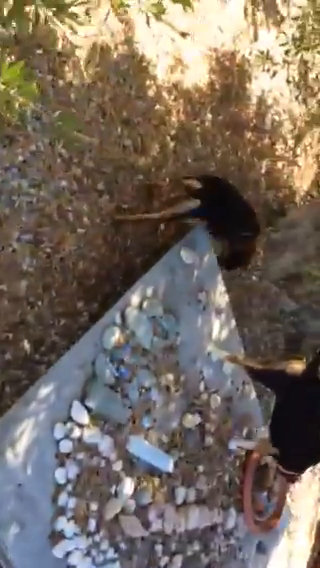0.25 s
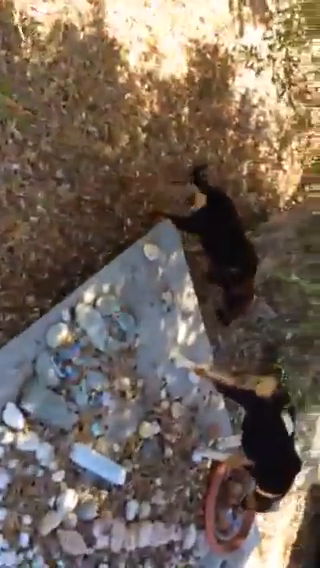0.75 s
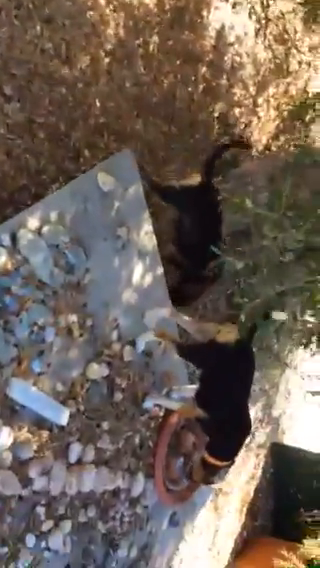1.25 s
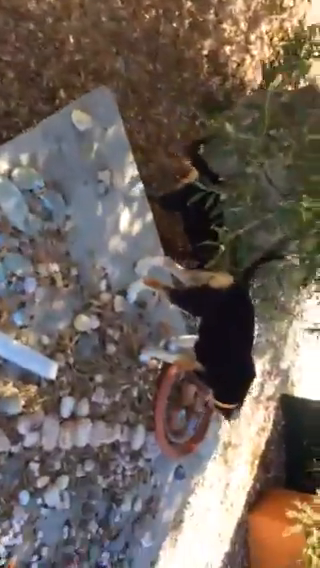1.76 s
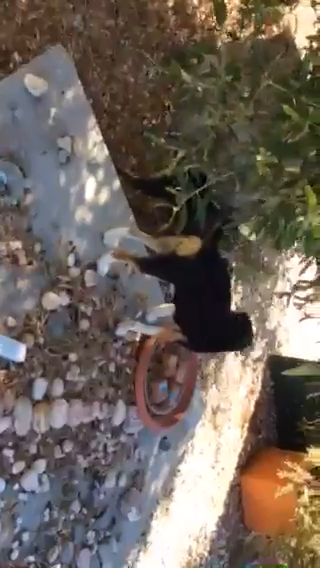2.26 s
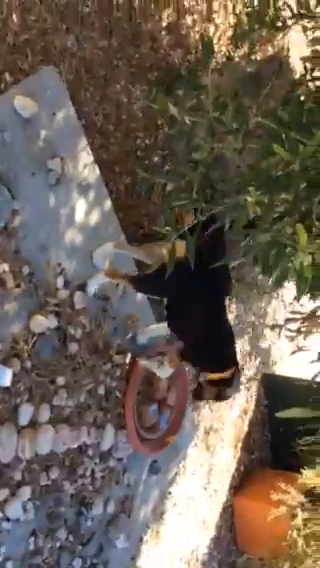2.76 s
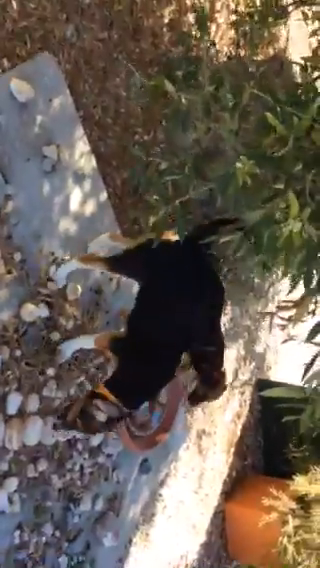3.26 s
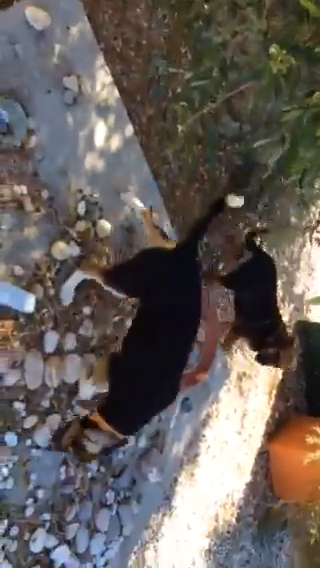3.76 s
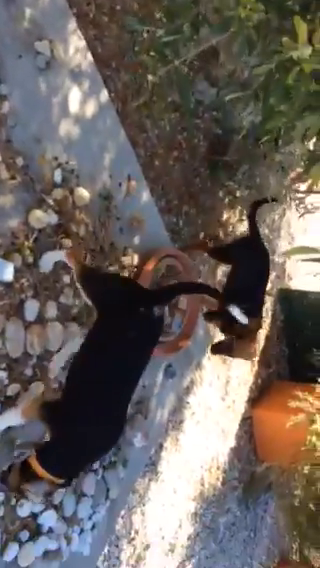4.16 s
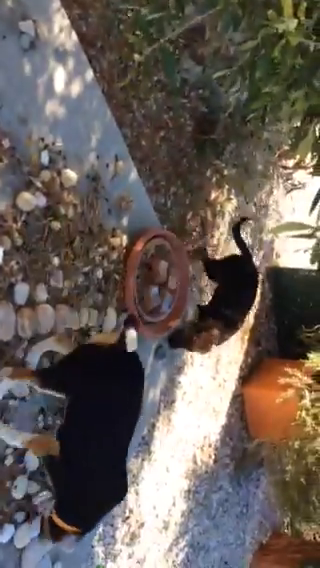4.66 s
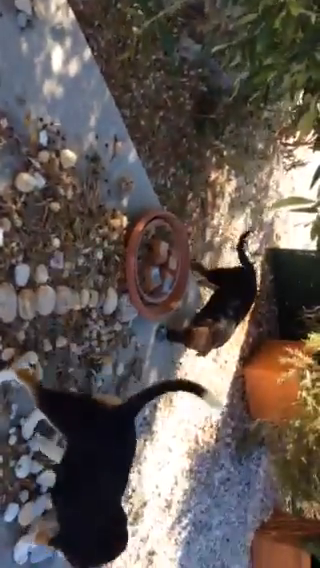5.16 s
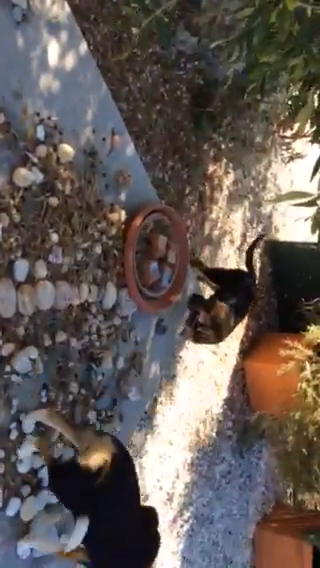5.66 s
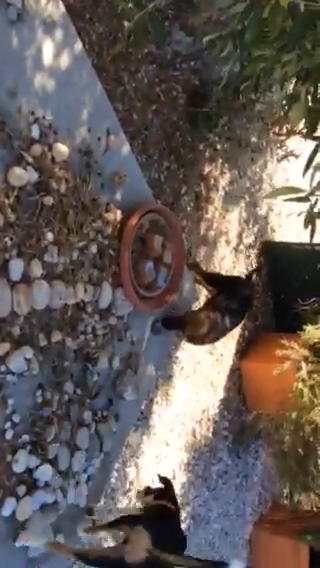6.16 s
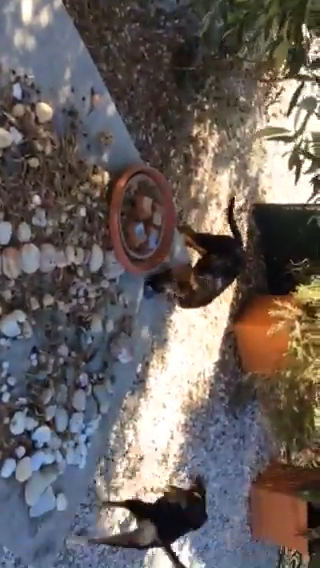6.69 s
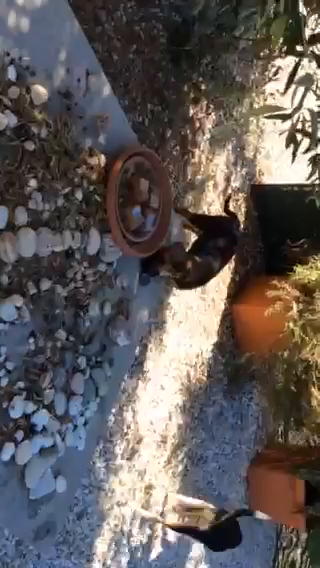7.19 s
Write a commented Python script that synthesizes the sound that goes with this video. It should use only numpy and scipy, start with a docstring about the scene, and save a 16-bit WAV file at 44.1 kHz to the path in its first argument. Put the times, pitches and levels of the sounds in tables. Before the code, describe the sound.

A constant high insect drone outdoors, with low breeze thumps at first, then a burst of close crunchy rubbing, clicks and dull taps that thins out.

```python
"""Cicadas around a yard, with handling close by

Cicadas buzz steadily in the trees, heard from a handheld phone: trains of clicks coloured by hollow bodies.
A light breeze buffets the microphone, mostly in the first three seconds, as shaped noise and single eddies.
Close to the microphone, mostly after that, come gritty rubbing scuffs and a dry crackle made of random clicks,
sharp bright ticks made of noise bursts, and soft knocks of fingers that ring the case's modes.
Behind lie a few faint far-off tones and a patchy outdoor background of filtered noise."""
import sys
import numpy as np
from scipy import signal
from scipy.fft import rfft, irfft
from scipy.io import wavfile
from scipy.ndimage import uniform_filter1d

SR = 44100
rng = np.random.default_rng(int(sys.argv[2]) if len(sys.argv) > 2 else 0)


def materialize(psi):
    """Save the field psi as 16-bit PCM at rate SR to the path in sys.argv[1].

    A 1-D psi becomes a single channel; in a 2-D psi each row is a channel.
    """
    bounded = np.clip(np.atleast_2d(psi).T, -1, 1)
    quanta = np.round(bounded * 32767).astype(np.int16)
    wavfile.write(sys.argv[1], SR, quanta)


N = 327663
TIME = np.arange(N) / SR
YARD_T60 = 0.31  # s


def gain_of(db):
    """Decibels to amplitude."""
    return 10 ** (np.asarray(db) / 20)


def evened(x):
    """Scales to rms 1."""
    return x / np.sqrt(np.mean(x ** 2) + 1e-20)


def read(points, hz):
    """A spectrum's level at any frequency, interpolated over log frequency."""
    f, level = np.transpose(points)
    return np.interp(np.log(hz + 1), np.log(f + 1), level)


def add(mix, s, sound):
    """Adds a sound to the mix from time s, or from the very start if s is negative."""
    part = mix[max(round(s * SR), 0):][:len(sound)]
    part += sound[:len(part)]


def colour(x, points, size=8192):
    """Causal minimum-phase filter with the given spectrum, falling 60 dB per octave beyond its ends."""
    hz = abs(np.fft.fftfreq(size, 1 / SR)) + 1
    octaves_outside = abs(np.log2(hz / np.clip(hz, points[0][0], points[-1][0])))
    level_db = np.maximum(read(points, hz) - 60 * octaves_outside, -100)
    log_gain = np.log(gain_of(level_db))
    response = np.exp(np.conj(signal.hilbert(log_gain)))
    taps = np.fft.ifft(response).real[:size // 2]
    return signal.oaconvolve(x, taps)[:len(x)]


def wander(rate):
    """Slow chance of rms 1, with changes up to about the given rate in Hz."""
    hz = np.fft.rfftfreq(N, 1 / SR)
    count = np.count_nonzero(hz < 300)
    spectrum = rfft(rng.standard_normal(4 * count))  # drawn coarsely, then interpolated
    slow = irfft(spectrum / (1 + (np.arange(2 * count + 1) * hz[1] / rate) ** 4))
    return evened(np.interp(TIME, np.linspace(0, TIME[-1], len(slow)), slow - slow.mean()))


def grains(per_s, spread_db):
    """Random clicks of very uneven size."""
    size = gain_of(spread_db * np.minimum(rng.exponential(1, N), 4))
    return size * rng.choice([-1, 1], N) * (rng.random(N) < per_s / SR)


def patchy(x, depth_db, size, count):
    """Narrow patches of the spectrum swell and fade by chance, each lasting count frames of the given size."""
    overlap = size - size // 4
    z = signal.stft(x, nperseg=size, noverlap=overlap)[2]
    across_pitch = uniform_filter1d(rng.standard_normal(z.shape), size=5, axis=0)
    patches = evened(uniform_filter1d(across_pitch, size=count, axis=1))
    return signal.istft(z * gain_of(depth_db * patches), nperseg=size, noverlap=overlap)[1][:N]


def scatter(x, t60):
    """Dense echoes from leaves, walls and ground: a decaying noise tail."""
    t = TIME[:SR // 2]
    tail = rng.standard_normal(len(t)) * gain_of(-60 * t / t60)
    return irfft(rfft(x, 2 * N) * rfft(tail / np.linalg.norm(tail), 2 * N))[:N]


def tymbals(throb, ring_turns, drift=.006):
    """Each cicada's tymbals buckle in a fast train of short noisy clicks that throbs in syllables."""
    # one row a cicada: [clicks/per s, syllables/per s, relative level/dB, direct share of its power/0-1]
    singers = [(233, 4.9, -7.5, 0.86), (228, 22, -7, 0.06), (228.4, 6.4, -9, 0.24), (249, 44, -7.5, 0.13),
               (228.8, 2.7, -7, 0.11)]
    out = np.zeros(N)
    for clicks, syllables, db, direct in singers:
        turns = np.cumsum(clicks * (1 + drift * wander(2))) / SR
        syllable_turns = np.cumsum(syllables * (1 + 0.137 * wander(2.18))) / SR
        swing = 1 + throb * np.sin(2 * np.pi * syllable_turns)
        ringing = np.exp(-(turns % 1) / ring_turns)  # decay counted in click periods
        near = evened(ringing * rng.standard_normal(N))
        smeared = rng.standard_normal(N)  # foliage blurs the clicks but spares the syllables
        share = np.clip(direct, 0, 1)
        out += gain_of(db) * swing * (np.sqrt(share) * near + np.sqrt(1 - share) * smeared)
    return out


def cicadas(main_db=-45, low_db=-54.5, top_db=-52, waver_db=0.5, patch_db=1.29):
    """The clicks ring hollow bodies: a strong peak near 5.5 kHz between two softer humps.

    The song's narrow bands swell and fade by chance."""
    # the song's main, lower and top humps: [f/Hz, relative level/dB per Hz]
    main_song = [(4000, -27), (4400, -20.5), (4750, -12.5), (5050, -5), (5520, 0.5), (5850, -1),
                 (6250, -9.5), (6750, -11.5), (7200, -16), (7800, -23.5)]
    low_song = [(1120, -35), (1900, -21.5), (2180, -10), (2360, -1.5), (2790, 7), (3320, 3.5), (3880, -3),
                (4260, -7.5), (4400, -12), (5720, -44), (9680, -120)]
    top_song = [(6500, -14), (7300, -8), (7950, -1.5), (8200, 0.5), (8800, -2), (9300, -6), (9800, -11),
                (11600, -9.5), (12300, -12.5), (13000, -30), (14400, -14), (15700, -41)]
    main = gain_of(main_db) * evened(colour(tymbals(throb=0.19, ring_turns=0.32), main_song))
    low = evened(colour(tymbals(throb=0.091, ring_turns=0.55), low_song))
    low = low * gain_of(low_db + waver_db * wander(2.7))
    top = evened(colour(tymbals(throb=0.24, ring_turns=0.95), top_song))
    top = top * gain_of(top_db + waver_db * wander(1.7))
    return patchy(main + low + top, depth_db=patch_db, size=1024, count=6)


def stroke(start, length, attack_s=0.0056, release_s=0.014, settle_db=-24, settle_s=0.029):
    """Pressure of the rub: it rises quickly, holds, lets go quickly, and leaves a faint longer tail."""
    after = np.maximum(TIME - start - length, 0)
    settle = gain_of(settle_db)
    release = (1 - settle) * np.exp(-after / release_s) + settle * np.exp(-after / settle_s)
    return np.clip((TIME - start) / attack_s, 0, 1) * release


def scuffs(scrape_db=0.0, rasp_db=1.0, grit_db=4.0, shift_db=4.0, clump_db=1.5, catch_db=3):
    """Tiny slips under pressure: a dull scrape and dry rasp of shifting tone, and fine grit in uneven clumps."""
    # rubbing scuffs close to the microphone: [start t/s, length/s,
    # then level/dB before trim of scrape, rasp and grit]
    rubs = [(0.274, 0.023, -58, -55.5, -52.5), (0.314, 0.041, -59, -71, -59), (0.682, 0.058, -80, -85, -56),
            (1.866, 0.024, -62, -74, -75), (2.813, 0.057, -61.5, -67.5, -59),
            (2.937, 0.064, -75, -57.5, -55.5), (3.041, 0.046, -52, -61, -52),
            (3.092, 0.063, -47.5, -54, -44), (3.13, 0.013, -49, -50, -43), (3.212, 0.069, -60.5, -69, -68),
            (3.339, 0.032, -50.5, -53, -54), (3.372, 0.041, -60, -61, -58), (3.624, 0.05, -57.5, -67, -66),
            (3.666, 0.042, -48, -53, -60), (3.688, 0.038, -52, -49, -50), (3.768, 0.02, -55, -52.5, -46),
            (3.787, 0.02, -54, -51, -42), (3.832, 0.011, -60, -54, -57), (4.014, 0.086, -51, -67, -53),
            (4.118, 0.043, -46, -58, -56), (4.169, 0.015, -57, -59, -55), (4.224, 0.013, -54, -60, -49),
            (4.31, 0.049, -52, -61, -66), (4.338, 0.04, -53, -58, -51.5), (4.532, 0.048, -58.5, -58, -63),
            (4.674, 0.023, -62, -75, -55), (4.738, 0.034, -54, -63, -58), (4.784, 0.072, -60, -79, -62),
            (4.962, 0.045, -51.5, -58, -57), (5.319, 0.027, -56, -66, -72), (5.868, 0.019, -60, -60, -74),
            (5.952, 0.044, -55, -63.5, -77), (6.353, 0.039, -57, -66, -75)]
    # colour of the dull scrape, dry rasp and fine grit: [f/Hz, relative level/dB per Hz]
    scrape_colour = [(130, -1), (200, 0.5), (290, 3.5), (390, 8.5), (500, -1), (660, 1.5), (860, 4.5),
                     (1080, -5), (1280, -4), (1600, -20.5)]
    rasp_colour = [(900, 6), (1400, 0.5), (2000, 1.5), (2800, -1.5), (3600, -28), (5500, 6)]
    grit_colour = [(2200, -10.5), (4000, -5), (8000, -4), (11500, 0.5), (14000, -1), (16000, 0)]
    catch = gain_of(catch_db * np.tanh(wander(80)))  # the rub catches and slips, thinning the sound
    scrape = colour(catch * grains(per_s=520, spread_db=2.0), scrape_colour)
    scrape = evened(patchy(scrape, depth_db=shift_db, size=1024, count=3))
    rasp = colour(grains(per_s=2600, spread_db=5.0), rasp_colour)
    rasp = evened(patchy(rasp, depth_db=shift_db, size=512, count=3))
    grit = colour(grains(per_s=13000, spread_db=5.0), grit_colour)
    grit = evened(grit * gain_of(clump_db * wander(90)))
    pressure = np.array([stroke(start, length) for start, length, *_ in rubs])
    # overlapping scuffs add in power
    dull, dry, fine = np.sqrt(gain_of(np.transpose(rubs)[2:]) ** 2 @ pressure ** 2)
    return gain_of(scrape_db) * dull * scrape + gain_of(rasp_db) * dry * rasp + gain_of(grit_db) * fine * grit


def crackle():
    """A dry mid-high crackle, as random clicks, during some scuffs."""
    # crackles: [start t/s, length/s, level/dB]
    crackles = [(3.094, 0.046, -57), (3.784, 0.017, -46), (4.114, 0.068, -51.5), (4.34, 0.034, -53)]
    # colour of the crackle: [f/Hz, relative level/dB per Hz]
    crackle_colour = [(2400, -11), (3200, -8), (4000, -5), (4800, -12), (7000, -9)]
    steady = evened(colour(grains(per_s=1100, spread_db=3.0), crackle_colour))
    return steady * sum(gain_of(db) * stroke(start, length) for start, length, db in crackles)


def ticks(tick_db=-2.5, rattle_db=-21, rattle_s=0.012, pitch_spread=0.032):
    """Sharp bright ticks, each with a lower clack and brief rattle, varying slightly in pitch."""
    # ticks: [t/s, snap's peak level/dB before trim, clack's level against the snap/dB]
    hits = [(0.094, -30, -16), (1.219, -26, -10), (1.483, -27, -35), (1.708, -29, -9), (2.852, -38, -22),
            (2.957, -22, -16), (3.046, -26, -19), (3.093, -25, -8), (3.111, -32, -15), (3.1405, -25, -12),
            (3.1437, -16.5, -12), (3.147, -24, -13), (3.159, -28, -18), (3.233, -15.5, -26),
            (3.355, -42, -1), (3.706, -33, 3), (3.721, -34, -15), (3.782, -28, -18), (3.8, -18.5, -24),
            (3.802, -19, -18), (3.806, -31, -13), (3.8118, -24, -28), (3.84, -25, -8), (3.849, -25, -16),
            (4.135, -25, -24), (4.17, -26, -18), (4.2295, -22, -15), (4.369, -38, -18), (4.693, -20.5, -7)]
    # colour of the bright snap and the lower clack: [f/Hz, relative level/dB per Hz]
    snap_colour = [(2000, -31), (3500, -31), (7000, -11), (9500, -3.5), (12000, 0), (14000, -2.5),
                   (15500, -2.5)]
    clack_colour = [(600, -3), (1200, 3), (1600, -23.5), (2100, 0.5), (2800, 9.5), (4200, -21), (6000, 1.5)]
    out, t = np.zeros(N), TIME[:SR // 16]
    crack = np.exp(-t / .0007)
    shape = crack + gain_of(rattle_db) * np.exp(-t / rattle_s)
    for (s, db, clack_db), noise in zip(hits, rng.standard_normal((len(hits), len(t)))):
        pitch = [np.exp(rng.uniform(-pitch_spread, pitch_spread)), 1]  # scales the frequencies only
        snap = colour(noise * shape, np.multiply(snap_colour, pitch))
        clack = colour(noise * shape, np.multiply(clack_colour, pitch))
        tick = snap / abs(snap).max() + gain_of(clack_db) * clack / abs(clack).max()
        add(out, s, gain_of(db + tick_db) * tick)
    return out


def knocks(split_hz=450, thud_turns=0.95, damping=1.14, contact_s=0.0023, grip=0.06, click_db=7, spot_db=5.5):
    """A finger's touch thuds for a few swings and rings the case; a harder one clicks and excites upper modes."""
    # touches: [t/s, peak level/dB, thud f/Hz, hardness as level on click and upper modes/dB]
    touches = [(0.805, -36, 534, -13), (1.151, -46.5, 600, -8), (3.043, -43, 380, -8),
               (3.116, -37, 865, -13), (3.144, -27.5, 358, -14), (3.248, -43, 350, -30),
               (3.348, -41, 605, -16), (3.356, -32, 840, -17), (3.381, -32, 161, -28),
               (3.418, -46, 332, -10), (3.442, -49, 191, -8), (3.675, -39, 497, -3),
               (3.681, -34.5, 332, -28), (3.697, -42, 410, -10), (3.799, -36.5, 436, -13.5),
               (4.019, -38, 293, -3), (4.034, -43, 332, -10), (4.049, -39.5, 920, -8),
               (4.063, -28.5, 830, -11), (4.08, -43, 600, -8), (4.094, -41, 400, -6),
               (4.107, -39, 870, -14), (4.11, -41, 940, -10), (4.132, -37, 390, -8), (4.147, -45, 700, -12),
               (4.16, -39.5, 295, -12), (4.177, -41, 384, -20), (4.188, -46, 372, -24),
               (4.229, -48, 490, -14), (4.312, -40, 380, -16), (4.3515, -27, 420, -15),
               (4.372, -41.5, 405, -22), (4.378, -34, 423, -26), (4.394, -44, 330, -26),
               (4.692, -38.5, 613, -5), (4.757, -41, 278, -8), (4.782, -34.5, 278, 6),
               (4.79, -37, 284, -29), (4.988, -39, 835, -11), (5.354, -36, 980, -5), (5.38, -35, 324, -22),
               (5.454, -48.5, 340, -30), (5.502, -39, 290, -14), (5.618, -43, 312, -18),
               (5.685, -40, 850, -12), (5.728, -45, 320, -20), (5.835, -49, 355, -24),
               (6.278, -36, 900, -15), (6.308, -43, 255, -4), (6.719, -48, 320, -14),
               (6.843, -41.5, 346, -17), (6.921, -45, 260, -13), (6.987, -43, 302, -24),
               (7.006, -25.5, 304, -21), (7.131, -35.5, 192, -28)]
    # modes the case rings with: [f/Hz, relative level/dB, t60/s]
    modes = [(152, -13.5, 0.11), (199.5, -18, 0.24), (273, -17, 0.096), (368.5, -8, 0.078),
             (543, 5.5, 0.033), (624, 6.5, 0.025), (860, 8, 0.028), (1014, 0, 0.039), (1220, -18, 0.013),
             (1607, -17, 0.03)]
    # colour of the contact click: [f/Hz, relative level/dB per Hz]
    contact_colour = [(300, -7.5), (700, 4.5), (1100, 0), (1500, -4.5), (1900, -9), (2600, -22)]
    out, t = np.zeros(N), TIME[:SR // 8]
    hz, mode_db, t60 = np.transpose(modes)[:, :, None]
    click = colour(signal.unit_impulse(len(t)), contact_colour)
    click = click / abs(click).max()
    for s, db, thud_hz, hardness in touches:
        detune, phase, spot = 2 * rng.random((3, len(modes), 1)) - 1
        # the grip detunes the modes a little
        swing = np.sin(2 * np.pi * hz * (1 + grip * detune) * t + np.pi * phase)
        level = mode_db + spot_db * spot + hardness * (hz > split_hz)  # each spot favours other modes
        ring = (gain_of(level) * np.exp(-np.log(1000) * t / t60) * swing).sum(0)
        age = thud_hz * t / thud_turns
        thud = (age * np.exp(1 - age)) ** damping * np.sin(2 * np.pi * thud_hz * t)
        knock = thud + ring * (1 - np.exp(-(t / contact_s) ** 2))  # the ring grows in over the contact
        add(knock, 1 / thud_hz, gain_of(click_db + hardness) * click)  # one thud swing after the touch
        add(out, s, gain_of(db) * knock / abs(knock).max())
    return out


def breeze(rumble_db=-2, flutter_db=-6, sag=0.1484):
    """Lumpy turbulence at the port, and single eddies: a few swings of pressure that slow as they pass."""
    # gusts on the microphone: [strongest t/s, rumble level/dB and flutter level/dB before trim,
    # build-up/s, dying away/s]
    gusts = [(0.07, -43.5, -44, 0.26, 0.46), (0.259, -44.5, -41, 0.042, 0.14),
             (0.55, -54.5, -77, 0.13, 0.11), (1.56, -41, -57, 0.27, 0.31), (1.775, -45.5, -44, 0.027, 0.04),
             (1.87, -47, -49.5, 0.034, 0.042), (2.305, -46.5, -70, 0.022, 0.025),
             (2.37, -37, -36.5, 0.02, 0.039), (2.47, -40, -44.5, 0.053, 0.061),
             (2.555, -47, -30, 0.011, 0.03), (2.67, -39, -60, 0.064, 0.045),
             (2.83, -46.5, -63, 0.078, 0.096), (6.7, -73, -57, 0.46, 0.38), (7.08, -63, -57.5, 0.12, 0.27)]
    # colour of the rumble and the finer flutter: [f/Hz, relative level/dB per Hz]
    rumble_colour = [(22, -31), (45, 5), (75, 11.5), (140, 1.5), (220, -3.5), (310, -29), (420, -34),
                     (600, -37), (900, -42)]
    flutter_colour = [(130, 0.5), (190, 0.5), (270, -4), (360, -12.5), (480, -20), (700, -24), (1000, -45)]
    # the strongest eddies: [middle t/s, peak level/dB, centre f/Hz, length/swings]
    eddies = [(0.038, -32.5, 256, .6), (0.05, -35, 130, .9), (0.074, -29, 92, .7), (0.145, -29, 95, .55),
              (0.162, -29.5, 230, .5), (0.246, -32, 300, .7), (0.264, -29.5, 115, 1.9),
              (0.345, -36, 160, 2.2), (0.381, -29.5, 168, .7), (0.439, -34.5, 164, .7),
              (0.543, -39, 89, .7), (0.597, -34.5, 110, .55), (0.683, -37, 197, .55), (0.787, -44, 110, 1),
              (1.086, -42.5, 149, .7), (1.325, -36, 104, .8), (1.41, -39, 90, 2.2),
              (1.543, -29.5, 123, .65), (1.652, -31, 92, .6), (1.664, -42, 400, .7), (1.668, -28, 170, .55),
              (1.778, -40, 165, 1.8), (1.837, -37, 110, .6), (2.159, -42.5, 178, .7), (2.354, -33, 270, .7),
              (2.362, -23.5, 102, .55), (2.396, -29, 230, .8), (2.466, -25, 150, .8),
              (2.512, -33, 140, 1.5), (2.549, -34, 290, 1), (2.564, -30, 580, 1.1), (2.568, -19, 235, .7),
              (2.581, -30, 110, .6), (2.634, -35, 164, .9), (2.701, -27.5, 120, .5), (2.825, -38, 223, .9),
              (2.904, -47, 210, .6)]
    # each gust is a lopsided bell; they add in power
    wind = np.array([np.exp(-((TIME - s) / np.where(TIME < s, rise, fall)) ** 2)
                     for s, _, _, rise, fall in gusts])
    low, high = np.sqrt(gain_of(np.transpose(gusts)[1:3]) ** 2 @ wind ** 2)
    rumble = evened(colour(grains(per_s=720, spread_db=3.0), rumble_colour))
    flutter = evened(colour(grains(per_s=1200, spread_db=4.0), flutter_colour))
    out = gain_of(rumble_db) * low * rumble + gain_of(flutter_db) * high * flutter
    t = TIME[:SR // 8] - TIME[SR // 16]
    for (s, db, hz, swings), phase in zip(eddies, rng.uniform(-np.pi, np.pi, len(eddies))):
        passing = hz * t / swings
        turns = np.cumsum(hz * (1 - sag * np.tanh(passing))) / SR
        eddy = np.cos(2 * np.pi * turns + phase) * np.exp(-passing ** 2)
        add(out, s + t[0], gain_of(db) * eddy)
    return out


def far_tones(tone_db=6.0, arch=0.06, blur_hz=32, echo_db=-5):
    """Faint tones that rise and fall in pitch, blurred into narrow hums on their way across the trees."""
    # far-off tones: [middle t/s, length/s, highest f/Hz before blur, level/dB before trim and echo]
    calls = [(2.222, 0.063, 1050, -66.5), (2.952, 0.18, 1020, -72.5), (4.862, .14, 637, -69),
             (6.24, 0.13, 515, -65.5), (6.47, .26, 584, -72.5), (7.375, 0.16, 635, -75),
             (7.355, .16, 1230, -77)]
    out = np.zeros(N)
    blur = wander(blur_hz) + 1j * wander(blur_hz)
    for s, length, hz, db in calls:
        place = np.linspace(-1, 1, round(length * SR))
        turn = np.exp(2j * np.pi * np.cumsum(hz * (1 - arch * place ** 2)) / SR)
        blurred = (turn * np.roll(blur, -round(s * SR))[:len(turn)]).real
        tone = evened(blurred * np.hanning(len(turn)))
        add(out, s - length / 2, gain_of(db + tone_db) * tone)
    return (out + gain_of(echo_db) * scatter(out, YARD_T60)) / np.sqrt(2)


def air(air_db=-61.5, patchy_db=3.0):
    """Faint far-off background: filtered noise whose narrow patches of tone come and go."""
    # colour of the distant outdoors: [f/Hz, relative level/dB per Hz]
    air_colour = [(15, -61), (25, -48), (54, 7), (84, -0.5), (125, 0), (182, -1), (247, -6), (340, -5),
                  (461, -8.5), (600, -7.5), (1020, -8.5), (1730, -14.5), (2300, -16), (2990, -42),
                  (5060, -120)]
    noise = colour(rng.standard_normal(N), air_colour)
    return gain_of(air_db) * evened(patchy(noise, depth_db=patchy_db, size=2048, count=14))


def scene(echo_db=-17):
    """Close sounds with a little yard echo, under the chorus, the breeze and the distance."""
    close = scuffs() + crackle() + ticks() + knocks()
    echo = gain_of(echo_db) * scatter(close, YARD_T60)
    return (cicadas() + close + echo + breeze() + far_tones() + air())[None]


def record(dry, edge_hz=15850):
    """The phone's band limit: a steep low-pass."""
    taps = signal.firwin(511, edge_hz, window=("kaiser", 9), fs=SR)
    return signal.oaconvolve(dry, taps[None], "same")


dry = scene()
out = record(dry)
materialize(out)
```